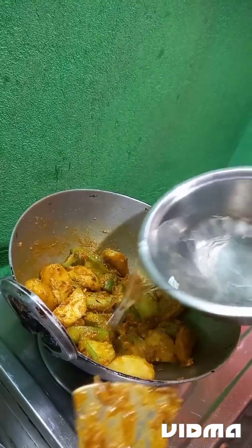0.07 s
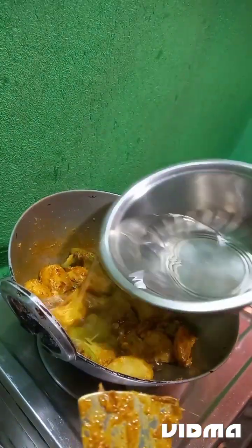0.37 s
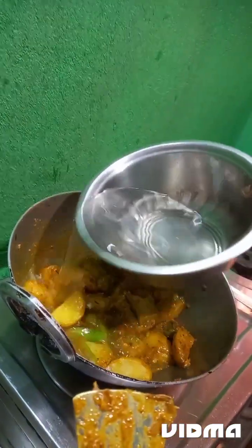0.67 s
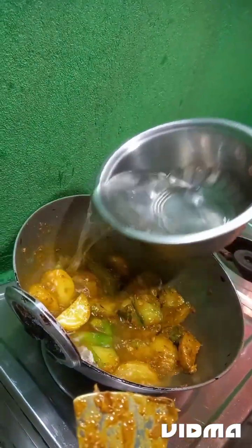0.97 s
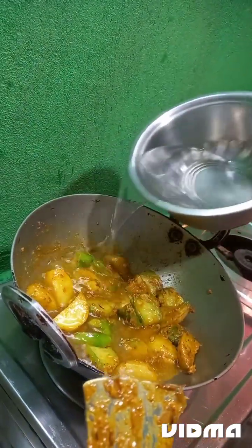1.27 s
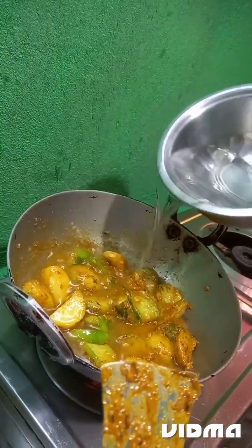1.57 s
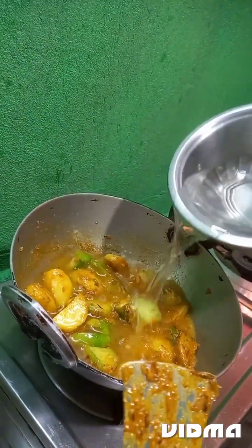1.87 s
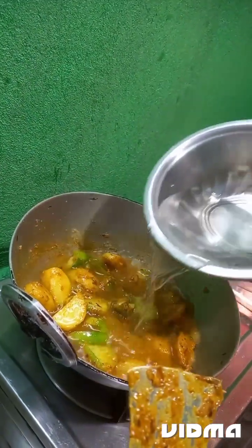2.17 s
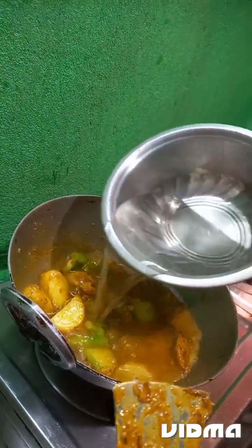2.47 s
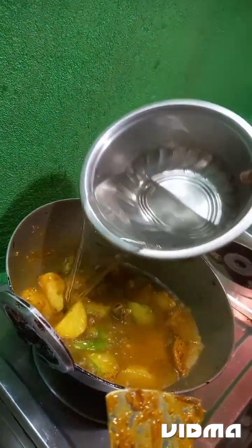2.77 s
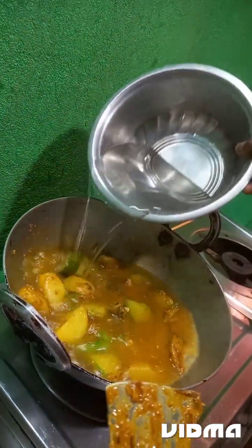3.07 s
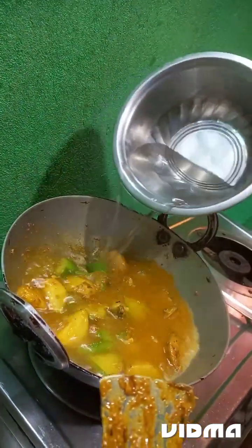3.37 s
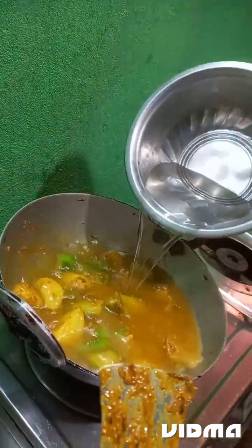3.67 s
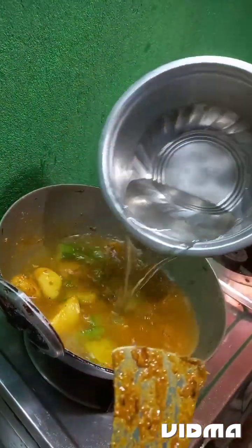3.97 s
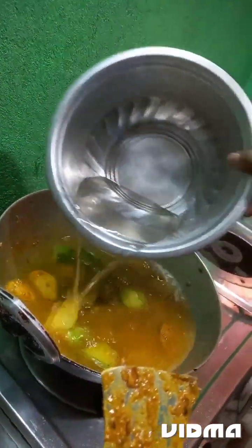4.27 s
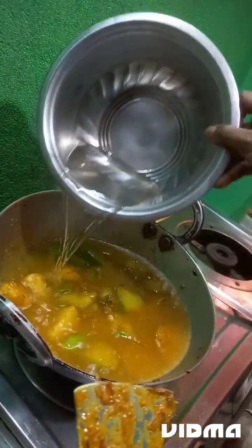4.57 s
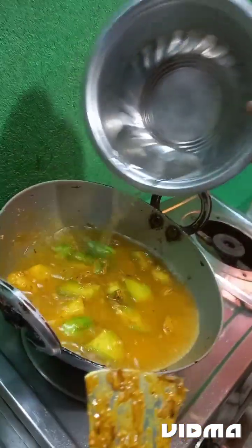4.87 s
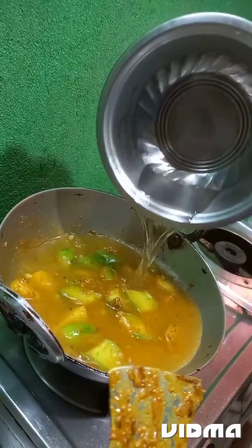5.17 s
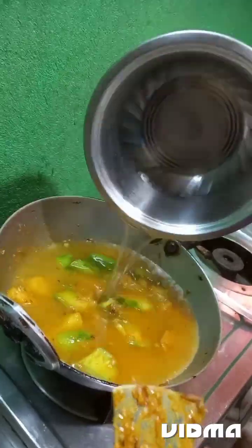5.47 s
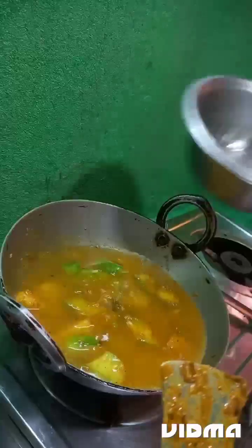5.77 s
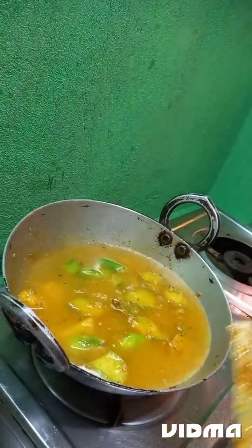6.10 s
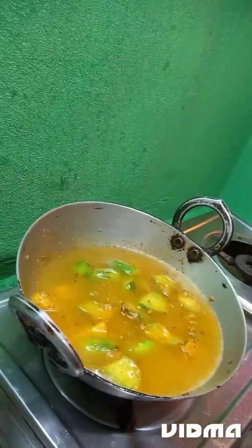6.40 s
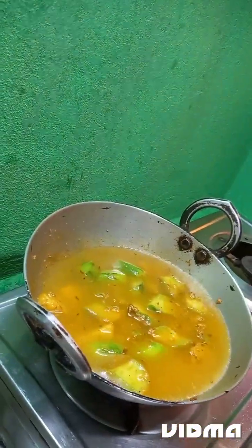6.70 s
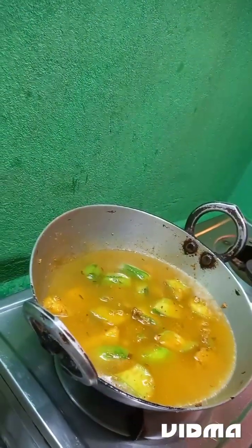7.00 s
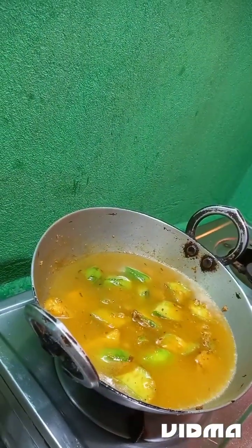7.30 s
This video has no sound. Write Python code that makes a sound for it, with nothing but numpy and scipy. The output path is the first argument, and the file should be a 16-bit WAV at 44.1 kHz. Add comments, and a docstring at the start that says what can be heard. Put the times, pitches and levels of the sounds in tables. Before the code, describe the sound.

Close up in a small kitchen, a hot pan of vegetables sizzles loudly as water runs in. Bright hissing and crackling come in spurts, mixed with small gurgles, splashes against the metal and an occasional sharp spit. After about four seconds the bubbling thins and the hiss settles to a softer fizz. Three dull knocks on the counter follow at the end, with a faint room rumble underneath.

```python
"""Loud sizzle: water poured from a steel bowl flashes to steam in a hot wok of fried vegetables.
Tiny steam bursts crackle and hiss, bubbles ring, steam pockets collapse and drops spit;
the stream drums on the water and the metal. All quietens as the wok fills and cools.
Last, three dull knocks ring the counter, as of the bowl put down. Small kitchen, faint low rumble."""
import sys
import numpy as np
from scipy import signal
from scipy.fft import rfft, irfft, next_fast_len
from scipy.io import wavfile

SR = 44100
rng = np.random.default_rng(int(sys.argv[2]) if len(sys.argv) > 2 else 0)


def persist_wave(psi):
    """Save psi, clipped to +-1, as 16-bit WAV."""
    counts = np.round(np.clip(psi, -1, 1) * 32767).astype(np.int16)
    wavfile.write(sys.argv[1], SR, np.atleast_2d(counts).T)


N = 323671
TIME = np.arange(N) / SR
BINS_HZ = np.maximum(np.fft.rfftfreq(2 * next_fast_len(N // 2 + 4096), 1 / SR), 1)
KITCHEN_T60_S = 0.062

# water flashing on hot metal: t/s, level/dB, spray re sizzle/dB
SIZZLE_LEVELS = [(0, -31, -4), (.15, -32.5, -4), (.22, -33, -2), (.3, -31, -3), (.57, -28.5, -2),
                 (.83, -27, -7), (1.0, -26, -7.5), (1.27, -27, -8.5), (1.33, -26, -3), (1.85, -27.5, -1),
                 (2.4, -26, -2), (3.45, -27, -2), (3.65, -25.5, -1.5), (3.87, -27.5, 1.5),
                 (3.98, -30, -3.5), (4.4, -33, -3.5), (5.06, -34.5, -3), (5.72, -32.5, -2), (6.3, -36, -1),
                 (7.34, -40.5, -3)]
# sizzle spectrum: f/Hz, level/dB
SIZZLE_SPECTRUM = [(600, -39), (1000, -7), (1600, -4), (2600, -1), (3600, 0.55), (5000, -0.63), (6800, -1),
                   (8000, 1.55), (9100, 1.5), (10300, -1.5), (12500, 1.5), (14500, 0.5), (16000, -1)]
# hiss near 6 kHz swells and dips slightly, brightest near 1 s and 6.3 s: t/s, lift/dB
HISS_LIFT = [(0, -1.5), (.22, -0.5), (.4, 0.2), (.97, -1.5), (1.05, 2), (1.13, 0), (2.3, -1), (2.6, -1.9),
             (3.8, -1), (4.35, -1.5), (5.2, -1), (5.7, -0.5), (6.3, 1.5), (7.34, 0)]
# water runs onto dry metal: t/s, length/s, lift/dB
SIZZLE_FLARES = [(.08, 0.082, 1), (1.357, 0.032, 3), (1.473, 0.056, 2.5), (1.604, 0.098, 2),
                 (1.978, 0.062, 1), (5.147, 0.22, 0.9), (5.468, 0.015, 5), (5.617, 0.1, 2),
                 (7.04, 0.086, 2)]
# stream drags air under: t/s, length/s, level/dB, f/Hz, scatter/oct
GURGLE_EVENTS = [(0.41, .04, -37, 2250, 0.19), (0.82, .035, -28, 2575, 0.172),
                 (0.942, 0.035, -29.5, 2530, 0.12), (1.039, 0.032, -31.5, 2450, 0.213),
                 (1.172, .1, -37, 2050, 0.14), (1.793, 0.13, -37, 2170, .12), (2, .17, -35, 2050, 0.12),
                 (2.168, .038, -30.5, 2300, 0.14), (2.82, 0.55, -36, 2140, 0.22),
                 (3.13, .046, -29.5, 2180, 0.19), (3.238, .035, -30.5, 2220, .09),
                 (3.403, 0.099, -33.5, 1867, .2), (3.595, 0.17, -38.5, 1950, .045),
                 (3.78, .055, -34, 1950, 0.017), (4.11, .06, -42, 2340, .1), (5.51, .26, -49, 2300, 0.2)]
# large bubbles: t/s, f/Hz, level/dB
LARGE_BUBBLES = [(.832, 2770, -24.5), (.837, 2385, -25), (.889, 2815, -24), (.919, 4040, -26),
                 (.967, 2515, -23), (1.012, 4620, -26), (1.258, 1890, -25), (1.372, 3440, -24),
                 (1.660, 2365, -27), (1.889, 2385, -26), (2.689, 2750, -34), (2.951, 1955, -28),
                 (3.067, 1935, -26), (3.157, 2795, -25), (3.260, 2275, -24), (3.434, 1568, -25.5),
                 (3.474, 2128, -24.5), (3.810, 1955, -25.5)]
# wok hollow, shallow and deep water: f/Hz, level/dB
SHALLOW_SPECTRUM = [(250, -53), (450, -6.5), (530, -4.5), (600, 3), (720, 3), (900, -5), (1100, 4),
                    (1450, -3.5), (2000, -3), (3200, -12)]
DEEP_SPECTRUM = [(250, -42), (480, -35), (600, -12), (720, -3.5), (860, 0.5), (980, 3), (1150, 5.5),
                 (1450, 7), (2000, -1), (3200, -34)]
# spitting drops: t/s, level/dB, spatter re crack/dB
SPIT_EVENTS = [(0.0978, -8.5, -17), (0.149, -11, -4), (0.442, -19, -3), (0.9706, -15, -10),
               (1.074, -12, -8), (1.544, -6, -26), (4.569, -20.5, -10.5), (5.4885, -13, 0),
               (5.5256, -19, -8), (5.939, -18, -12), (6.062, -17, -5), (6.6167, -16.5, -6)]
# blows and rebounds on the counter: t/s, level/dB, cutoff/Hz
KNOCK_BLOWS = [(6.757, -24, 480), (6.776, -27, 1620), (6.792, -24.5, 800), (6.875, -37, 900),
               (6.926, -42, 800), (7.057, -23.5, 560), (7.084, -22, 560), (7.183, -23, 680),
               (7.214, -28, 450)]
# counter and what stands on it: f/Hz, level/dB, t60/s
COUNTER_MODES = [(222, -10.5, .16), (255, -4.5, 0.061), (283.4, 1.5, 0.15), (328, -10.5, .18),
                 (394, -20, .3), (425, -18, .22), (484, -10.5, .36), (655, -6, 0.22), (748, -11.5, .25),
                 (900, -8.5, .18), (1280, -5, .13)]
# force of the stream: t/s, level/dB
STREAM_LEVELS = [(.3, -70), (.7, -49), (1.2, -41.5), (1.7, -40.5), (2.6, -42), (3.8, -47.5), (4.05, -52.5),
                 (4.3, -58.5), (5.2, -62), (5.75, -53.5), (6.7, -78)]
# stream impact spectrum: f/Hz, level/dB
STREAM_SPECTRUM = [(25, -58), (60, -49), (140, -4.5), (175, -11), (245, -3.5), (330, 1.5), (385, 1),
                   (440, 3.5), (520, 0.5), (800, -9), (1500, -29)]
# wok metal: f/Hz, level/dB, t60/s
WOK_MODES = [(582, -9, 0.12), (1805, -8.5, .18), (2415, -7, .11), (2795, -1.5, 0.11)]
# stream strikes the bare side: t/s, length/s, level/dB, overtone tilt/(dB/oct)
SPLASHES = [(0.093, 0.041, -42, -24), (0.327, 0.23, -47.5, -20), (0.764, 0.12, -40, 14),
            (0.963, 0.19, -38.5, 1)]
# room rumble: f/Hz, level/dB
RUMBLE_SPECTRUM = [(30, -25), (55, 5), (105, -2), (122, 1), (141, 6), (175, -8.5), (260, -8), (290, 9),
                   (315, -12), (342, 9), (380, -25), (500, -31), (2000, -30)]
# low room boom: t/s, length/s, level/dB
BOOM_SWELLS = [(1.3, 0.34, -59), (2.52, .75, -59), (3.73, 0.088, -60), (6.78, 0.14, -51),
               (7.03, 0.16, -50.5), (7.17, 0.15, -42)]
# air resonances and nulls of wok and corner: f/Hz, width/Hz, lift/dB
AIR_RESONANCES = [(304, 4.7, 8.5), (331, 20, 5), (370, 20, -2.5), (433.4, 5.4, 13.5), (517, 17, 6),
                  (549, 32, -8), (599.2, 16.4, 11), (842, 41, 9), (948, 13, 8), (1088, 38, -3.5),
                  (1439, 12, 7), (1604, 33, 6), (1700, 16, 7.5), (1822, 22, 6.5), (1923, 35, 8),
                  (2074, 30, 4), (2379, 50, 7.5), (2590, 53, 5.5), (2785, 49, 6)]
# likeness of the ears: f/Hz, coherence (negative acts as 0), left lead/rad
EAR_COHERENCE = [(30, -1.2, -4.5), (90, 0.87, 1), (200, 0.76, 0), (300, 0.81, 0), (450, 0.96, 1),
                 (704, 0.43, -0.5), (990, 0.73, 1.5), (1023, 0.6, 3.5), (1540, -0.0098, 4.5),
                 (1660, 0.36, 7), (2050, 0.58, 6.5), (2300, 0.5, 6.5), (2790, -0.22, 7), (3070, -0.15, 9.4),
                 (3220, -0.35, 10), (3410, 0.44, 12), (3770, -0.013, 12), (5230, -0.024, 11),
                 (15200, 0.0022, 13.5)]
# ear balance: f/Hz, left minus right/dB
EAR_BALANCE = [(90, 3), (200, -6.5), (320, 0.5), (440, -3.5), (600, 5), (850, 0.5), (1200, -1), (2000, -2),
               (3000, 1.1), (6500, 1.5), (15000, 2)]


def sizzle():
    """Steam bursts crack and droplets ring, in spurts over a hiss; fewer as the pan cools."""
    level_db, spray_db = steam_levels_db()
    activity = from_db(level_db - level_db.max())
    cracks = unit_rms(grains(per_s=11000 * activity, spread_db=3.5) / np.sqrt(activity))
    fizz = unit_rms(droplets(per_s=7000 * activity) / np.sqrt(activity))
    crackle = round_the_pan(from_db(-6.5) * cracks + from_db(-3.5) * fizz, wet_db=-2.5)
    hiss = rng.standard_normal((2, N))
    spurts = from_db(.55 * drift(rate_hz=9) + .3 * drift(rate_hz=55))
    sound = from_pan((crackle + hiss) * spurts, at_bins(SIZZLE_SPECTRUM))
    coarse = signal.sosfiltfilt(butter_hz(9800), sound)
    spray = from_db(spray_db + 0.5) * (sound - coarse)  # finest spray, off bare hot metal
    hiss_band = signal.sosfiltfilt(butter_hz([5100, 7900], "band"), sound)
    hiss_gain = from_db(at_samples(HISS_LIFT)[0])
    return from_db(level_db + 1.5) * (coarse + spray + (hiss_gain - 1) * hiss_band)


def steam_levels_db():
    """Sizzle level with flares; spray level re sizzle."""
    level_db, spray_db = at_samples(SIZZLE_LEVELS)
    flares_db = sum(db * swell(t_s, length_s, attack_s=0.02, release_s=0.014)
                    for t_s, length_s, db in SIZZLE_FLARES)
    return level_db + flares_db, spray_db


def droplets(per_s, low_hz=2738, high_hz=14900, t60_cycles=26):
    """Each bursting droplet rings briefly at one of 44 pitches."""
    bursts = grains(per_s, spread_db=2.5)
    pitch_index = rng.integers(0, 44, N)
    return sum(hz / low_hz * ring(bursts * (pitch_index == k), hz, t60_cycles / hz)
               for k, hz in enumerate(np.geomspace(low_hz, high_hz, 44)))


def boil():
    """Small bubbles ring in gulps, scattered round a moving centre pitch."""
    gain, centre_hz, scatter_oct = bubbling()
    births = grains(per_s=520, spread_db=1.3)
    pitch_hz = centre_hz * 2 ** (scatter_oct * rng.standard_normal(N))
    rings = np.zeros((2, N + SR))
    for channel, start in zip(*np.nonzero(births)):
        note = births[channel, start] * bubble(pitch_hz[start])
        rings[channel, start:start + len(note)] += note
    gulps = from_db(.9 * drift(rate_hz=18))
    return gain * gulps * from_pan(rings[:, :N])


def bubbling(simmer_hz=2238, simmer_oct=0.181):
    """Gain, pitch and scatter, weighted by power: gurgles plus a simmer that tracks the sizzle."""
    simmer = from_db(steam_levels_db()[0] - 16) ** 2
    gurgles = [swell_power([row[:3]], attack_s=0.031, release_s=0.027) for row in GURGLE_EVENTS]
    powers = np.array([simmer] + gurgles)
    pitches = np.array([(simmer_hz, simmer_oct)] + [row[3:] for row in GURGLE_EVENTS])
    total = powers.sum(axis=0)
    centre_hz, scatter_oct = pitches.T @ powers / total
    return np.sqrt(total), centre_hz, scatter_oct


def bubble(hz, t60_cycles=100, rise_per_s=0.9):
    """Trapped air rings, rising in pitch as it nears the surface."""
    t = TIME[:SR // 20]
    cycles = hz * t * (1 + rise_per_s * t / 2)
    return np.sin(2 * np.pi * cycles) * from_db(-60 * cycles / t60_cycles)


def churn():
    """Steam pockets collapse, driven by heat and stream; the hollow rings higher as water rises."""
    sizzle_db, stream_db = at_samples(SIZZLE_LEVELS)[0], at_samples(STREAM_LEVELS)[0]
    level_db = -37.5 + 0.76 * (sizzle_db - sizzle_db.max()) + 0.11 * (stream_db - stream_db.max())
    pockets = unit_rms(grains(per_s=1500, spread_db=3.5)) + from_db(-3.5) * rng.standard_normal((2, N))
    shallow = from_pan(pockets, at_bins(SHALLOW_SPECTRUM))
    deep = from_pan(pockets, at_bins(DEEP_SPECTRUM))
    fill = fill_fraction()
    return from_db(level_db + 1.26 * drift(rate_hz=12)) * ((1 - fill) * shallow + fill * deep)


def fill_fraction(pour_end_s=6.0):
    """Water rises steadily while the bowl empties."""
    return np.interp(TIME, [0, pour_end_s], [0.24, 0.69])


def spits(crack_s=.0003, spatter_s=.005):
    """Single drops burst: sharp crack, short spatter."""
    out, t = np.zeros((2, N)), TIME[:SR // 40]
    for t_s, db, spatter_db in SPIT_EVENTS:
        envelope = np.exp(-t / crack_s) + from_db(spatter_db) * np.exp(-t / spatter_s)
        burst = rng.standard_normal((2, len(t))) * envelope
        start = round(t_s * SR)
        out[:, start:start + len(t)] += from_db(db) * burst / np.abs(burst).max()
    return kitchen(signal.sosfilt(butter_hz(1400, "high"), out), wet_db=-3, t60_s=KITCHEN_T60_S)


def knocks(rattle_s=0.074):
    """Soft blows ring the counter's modes, with a short dull rattle."""
    blows = np.zeros((len(KNOCK_BLOWS), N))
    for blow, (t_s, db, cutoff_hz) in zip(blows, KNOCK_BLOWS):
        contact = signal.sosfilt(butter_hz(cutoff_hz), signal.unit_impulse(256))
        blow[round(t_s * SR):][:len(contact)] = from_db(db) * contact
    body = 0
    for k, (hz, db, t60_s) in enumerate(COUNTER_MODES):
        force = from_db(db + rng.normal(0, 1.0, len(blows))) @ blows
        body += (-1) ** k * ring(force, hz, t60_s)  # alternate signs: thud swells over a few cycles
    shake = signal.lfilter([1], [1, -np.exp(-1 / (rattle_s * SR))], blows.sum(axis=0) + 1e-18)
    rattle = unit_rms(signal.sosfilt(butter_hz([190, 430], "band"), rng.standard_normal(N)))
    thuds = from_db(-6.5) * body + from_db(-17) * shake * rattle
    return kitchen(signal.sosfilt(butter_hz(150, "high"), thuds), wet_db=-7, t60_s=0.33)


def plunge():
    """The stream drums on water and vegetables."""
    level_db = at_samples(STREAM_LEVELS)[0] - 3.5
    return from_db(level_db) * from_pan(grains(per_s=1400, spread_db=1.0), at_bins(STREAM_SPECTRUM))


def wok(full_damping_db=33, pivot_hz=2420):
    """Drops ring the metal, quieter as water rises; each splash weights the overtones its own way."""
    drumming = from_db(-53 - full_damping_db * fill_fraction())
    hits = grains(per_s=1000, spread_db=3.0)
    out = 0
    for k, (hz, db, t60_s) in enumerate(WOK_MODES):
        octaves = np.log2(hz / pivot_hz) if k else 0
        splashes = [(t_s, length_s, hit_db + tilt * octaves) for t_s, length_s, hit_db, tilt in SPLASHES]
        gain = np.sqrt(drumming ** 2 + swell_power(splashes, attack_s=0.033, release_s=0.027))
        out += from_db(db) * gain * from_pan(ring(hits, hz, t60_s))
    return out


def room(boom_hz=99, wander_hz=3.925):
    """Faint rumble and a narrow low resonance that swells most after the knocks."""
    gain = np.sqrt(from_db(-70) ** 2 + swell_power(BOOM_SWELLS, attack_s=0.045, release_s=.04))
    phase = 2 * np.pi * np.cumsum(boom_hz + wander_hz * drift(rate_hz=14)) / SR
    boom = gain * from_db(3.5 * drift(rate_hz=13)) * np.sin(phase) * np.sqrt(2)
    rumble = from_pan(rng.standard_normal((2, N)), at_bins(RUMBLE_SPECTRUM))
    return boom * from_db([[.7], [-.7]]) + from_db(-64.5) * rumble


def from_pan(pair, spectrum_db=0):
    """Two independent signals, coloured by the wok's air and spread over the ears; mono rms 1."""
    lift_db = sum(db / (1 + (2 * (BINS_HZ - hz) / width_hz) ** 2) for hz, width_hz, db in AIR_RESONANCES)
    mid, side = rfft(pair, 2 * len(BINS_HZ) - 2) * from_db(spectrum_db + lift_db)
    coherence = np.clip(at_bins(EAR_COHERENCE), 0, 1)
    lead_rad = at_bins(EAR_COHERENCE, column=2)
    ear_sign = np.array([[1], [-1]])
    ears = np.sqrt(1 + coherence) * mid + ear_sign * np.sqrt(1 - coherence) * side
    balance = from_db(ear_sign * at_bins(EAR_BALANCE) / 2)
    out = irfft(ears * balance * np.exp(.5j * ear_sign * lead_rad))[:, :N]
    return out / np.std(out.mean(axis=0))


def round_the_pan(x, wet_db, places=6, hops_per_s=400):
    """Bursts hop between places in the pan, each with its own reflections."""
    place = rng.integers(0, places, N)[np.arange(N) // (SR // hops_per_s)]
    return sum(kitchen(x * (place == k), wet_db, KITCHEN_T60_S) for k in range(places))


def kitchen(x, wet_db, t60_s, mono_below_hz=160):
    """Adds dense reflections off close walls, alike at both ears in the bass."""
    t = TIME[:SR // 2]
    mid, side = rng.standard_normal((2, len(t))) * from_db(-60 * t / t60_s) * (t > .001)
    side = signal.lfilter(*signal.butter(1, mono_below_hz, "high", fs=SR), side)
    tail = np.array([mid + side, mid - side])
    tail /= np.sqrt(np.sum(tail ** 2, axis=1, keepdims=True))
    return x + from_db(wet_db) * signal.fftconvolve(x * np.ones((2, 1)), tail, axes=1)[:, :N]


def grains(per_s, spread_db):
    """Two trains of random clicks, most small, a few large."""
    sizes = from_db(spread_db * np.minimum(rng.exponential(1, (2, N)), 5))
    return sizes * rng.choice([-1, 1], (2, N)) * (rng.random((2, N)) < per_s / SR)


def ring(clicks, hz, t60_s):
    """Resonator: a unit click starts a decaying unit sine."""
    radius, step_rad = from_db(-60 / (t60_s * SR)), 2 * np.pi * hz / SR
    feedback = [1, -2 * radius * np.cos(step_rad), radius * radius]
    return signal.lfilter([0, np.sin(step_rad)], feedback, clicks + 1e-18)


def swell(t_s, length_s, attack_s, release_s):
    """Linear rise towards 1; exponential decay from t_s + length_s."""
    rise = np.clip((TIME - t_s) / attack_s, 0, 1)
    return rise * np.exp(-np.maximum(TIME - t_s - length_s, 0) / release_s)


def swell_power(rows, attack_s, release_s):
    """Summed power of swells; rows: t/s, length/s, level/dB."""
    return sum((from_db(db) * swell(t_s, length_s, attack_s, release_s)) ** 2
               for t_s, length_s, db in rows)


def drift(rate_hz):
    """Slow random curve, rms 1."""
    knots = rng.standard_normal(4096)
    return unit_rms(np.interp(TIME * 2 * rate_hz, np.arange(len(knots)), knots))


def at_samples(rows):
    """Value columns of a time table at every sample."""
    t_s, *columns = np.transpose(rows)
    return [np.interp(TIME, t_s, values) for values in columns]


def at_bins(rows, column=1):
    """One column at every FFT bin, interpolated over log f."""
    columns = np.transpose(rows)
    return np.interp(np.log(BINS_HZ), np.log(columns[0]), columns[column])


def butter_hz(edges_hz, kind="low"):
    """Second-order filter design, as sections."""
    return signal.butter(2, edges_hz, kind, fs=SR, output="sos")


def from_db(db):
    """dB to gain."""
    return 10 ** (np.asarray(db) / 20)


def unit_rms(x):
    """Scale to rms 1."""
    return x / np.sqrt(np.mean(x ** 2) + 1e-20)


def scene():
    """Wok, counter and room, in stereo."""
    return sizzle() + boil() + churn() + plunge() + wok() + spits() + knocks() + room()


def record(dry):
    """Steep low-pass at 15450 Hz."""
    return signal.sosfilt(signal.ellip(12, .1, 90, 15450, fs=SR, output="sos"), dry)


dry = scene()
out = record(dry)
persist_wave(out)
```